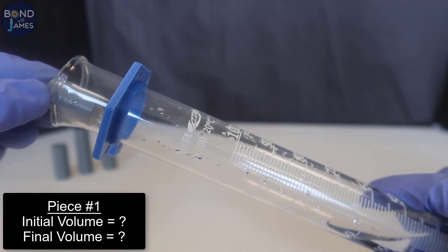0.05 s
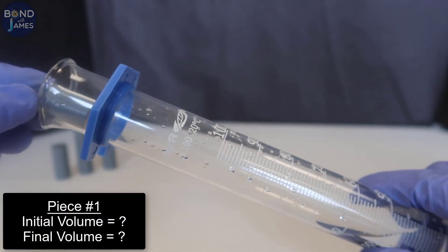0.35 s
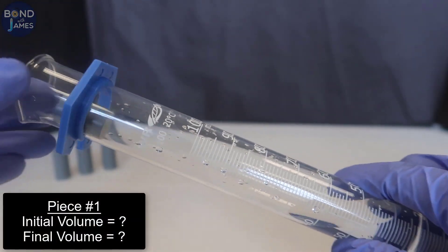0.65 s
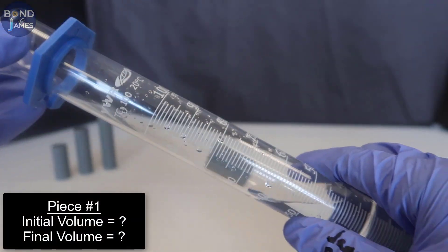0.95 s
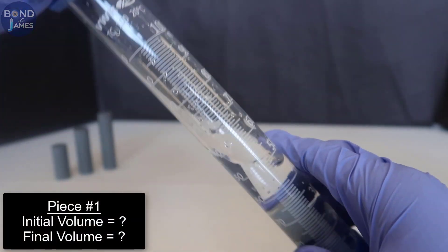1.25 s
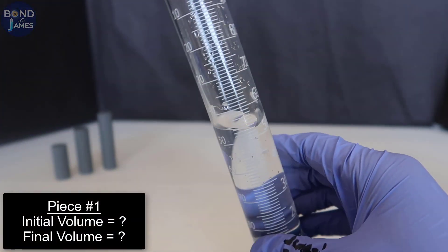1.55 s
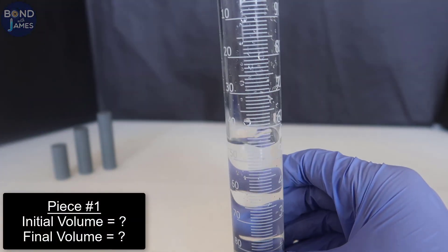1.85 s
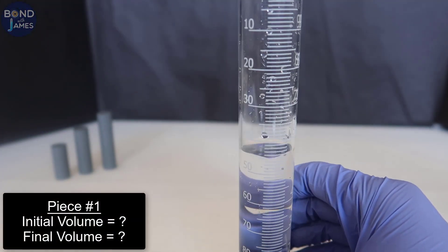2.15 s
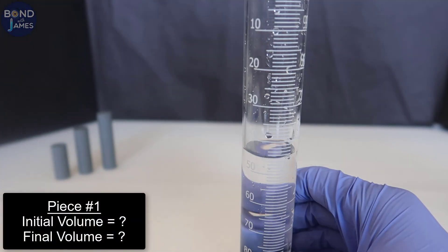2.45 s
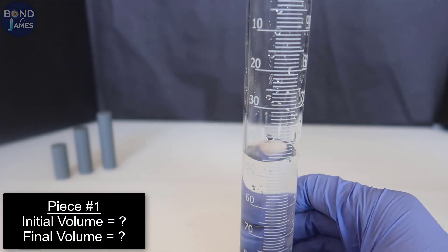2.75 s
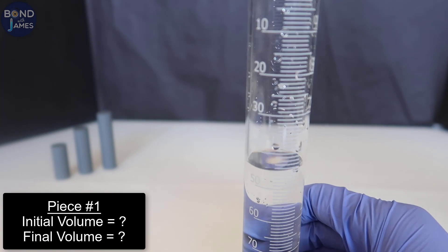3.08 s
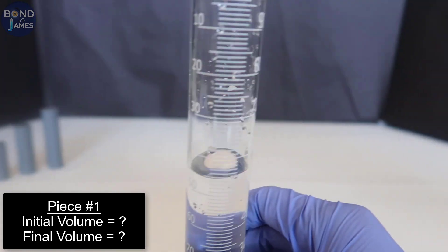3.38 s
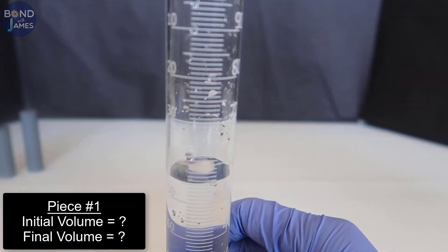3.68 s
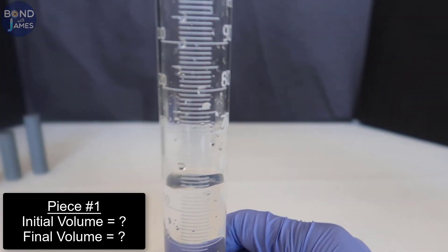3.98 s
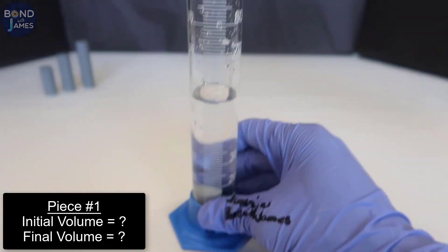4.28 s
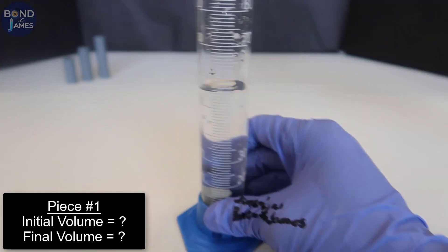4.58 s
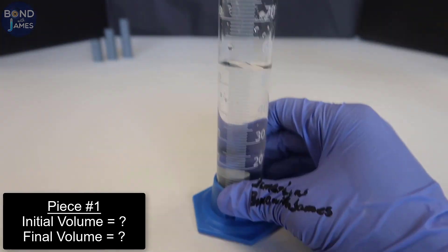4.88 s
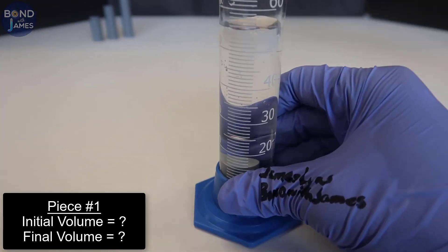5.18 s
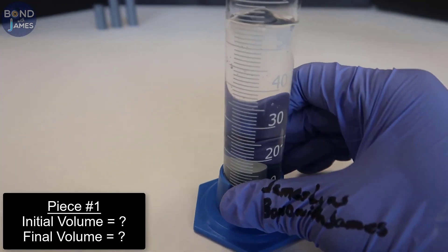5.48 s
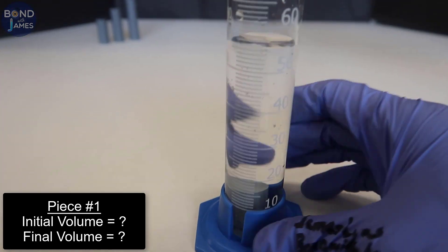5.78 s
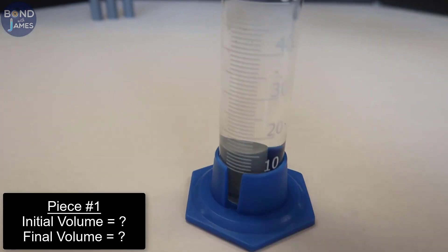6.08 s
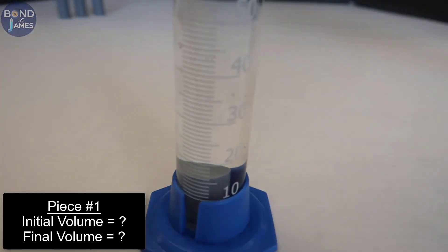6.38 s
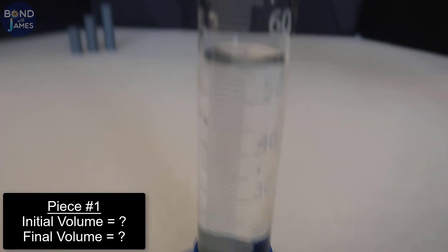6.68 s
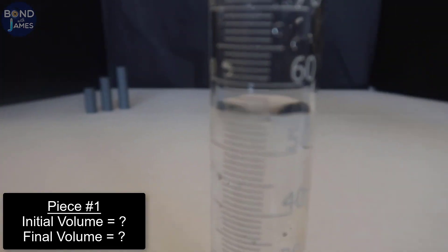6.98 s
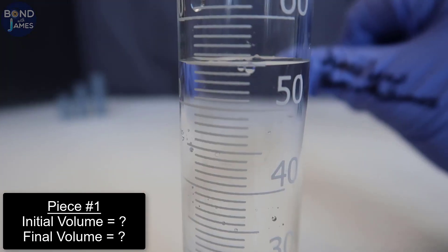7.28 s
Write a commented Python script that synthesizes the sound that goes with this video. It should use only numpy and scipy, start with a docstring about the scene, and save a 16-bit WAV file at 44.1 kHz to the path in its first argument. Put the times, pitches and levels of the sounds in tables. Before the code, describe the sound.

A low ventilation hum runs throughout in a small, quiet room, with everything close to the microphone. From about 0.4 seconds a sleeve and glove rustle faintly, with tiny taps on glass. At 1.3 seconds a plastic piece plunges into water with a small gulp and bubble plinks; at 1.6 the glass cylinder rings briefly. Dull knocks with light taps come at 2.1 and 2.4, then a glove scuff, short sliding pushes and a sharp click at 3.3. From 3.8 to 5.1 the cylinder drags over the table with a dry hiss, taps, knocks and a low shudder, loudest near 4.6. Two short shuddering pushes follow around 5.3 and 5.5, with a faint plink. The glove scuffs near 5.9, small plastic clicks scatter from 6.3 to 6.7, and a last light tap comes at 7.

```python
"""A table in a quiet, humming room. A gloved hand tilts a glass cylinder of water: a plastic piece
slides in with a gulp of trapped air and a few bubbles, and the glass rings briefly as it lands.
Then things are dragged over the table: friction gives a dry hiss, and stick-slip a low shudder that
reaches the microphone through its stand. Sleeve and glove rustle, plastic clicks, the table knocks,
and glass and other hard things are lightly tapped."""
import sys
import numpy as np
from scipy import signal
from scipy.fft import rfft, irfft, next_fast_len
from scipy.io import wavfile
from scipy.ndimage import uniform_filter1d

SR = 44100
rng = np.random.default_rng(int(sys.argv[2]) if len(sys.argv) > 2 else 0)


def materialize(psi):
    """Save the field psi as 16-bit PCM at rate SR to the path in sys.argv[1].

    A 1-D psi becomes a single channel; in a 2-D psi each row is a channel.
    """
    bounded = np.clip(np.atleast_2d(psi).T, -1, 1)
    quanta = np.round(bounded * 32767).astype(np.int16)
    wavfile.write(sys.argv[1], SR, quanta)


N = 328364

# Short pushes over the table. Each row: start and length in seconds, hiss, ring and shudder in dB.
PUSHES = [(2.837, 0.36, -61, -60.5, -50.5), (3.38, 0.2, -59, -57, -48.5), (3.684, 0.053, -66, -66, -60),
          (5.15, 0.13, -72.5, -67.5, -77), (5.269, 0.13, -56.5, -55, -39),
          (5.471, 0.083, -58.5, -55, -45.5), (5.595, 0.045, -71.5, -69, -64)]
PUSH_EDGES_S = (0.02, 0.031)  # attack, release


def undb(db):
    """Decibels to gain."""
    return 10 ** (np.asarray(db) / 20)


def unit(x):
    """Scale to rms 1."""
    return x / np.sqrt(np.mean(x ** 2))


def fade(rows, column):
    """Gain from a dB column interpolated over time, silent outside its span."""
    rows = np.array(rows)
    return undb(np.interp(np.arange(N) / SR, rows[:, 0], rows[:, column], -200, -200))


def add(track, start_s, sound):
    """Mix a sound into the track."""
    i = int(start_s * SR)
    track[i:i + len(sound)] += sound[:N - i]


def colour(x, points):
    """Filter by a curve of (Hz, dB) points that falls steeply beyond its ends; rms 1."""
    hz, db = np.transpose(points)
    size = next_fast_len(N, real=True)
    log_hz = np.log(np.arange(size // 2 + 1) * SR / size + 1)
    beyond = np.maximum(np.log(hz[0]) - log_hz, 0) + np.maximum(log_hz - np.log(hz[-1]), 0)
    gain = undb(np.interp(log_hz, np.log(hz), db) - 60 * beyond)
    return unit(irfft(rfft(x, size) * gain, size)[:N])


def resonate(x, hz, width_hz):
    """Steep resonance: the same band-pass twice."""
    b, a = signal.iirpeak(hz, hz / width_hz, SR)
    return signal.lfilter(b, a, signal.lfilter(b, a, x))


def ring(modes, detune=0., length_s=.4):
    """Damped sines of one blow, alternating in sign, with optional random detuning."""
    t = np.arange(int(length_s * SR)) / SR
    out = np.zeros(len(t))
    for k, (hz, db, t60_s) in enumerate(modes):
        detuned_hz = hz * (1 + detune * rng.standard_normal())
        out += (-1) ** k * undb(db - 60 * t / t60_s) * np.sin(2 * np.pi * detuned_hz * t)
    return out


def soften(x, rise_s):
    """Round off the onset."""
    t = np.arange(len(x)) / SR
    return x * (1 - np.exp(-(t / rise_s) ** 2))


def walk(rate_hz):
    """Smooth random wander, rms 1."""
    hold = int(SR / rate_hz)
    steps = np.repeat(rng.standard_normal(N // hold + 1), hold)
    return unit(uniform_filter1d(uniform_filter1d(steps, hold), hold)[:N])


def friction(grain_db, flutter_db):
    """Countless tiny slips of uneven size, in flurries."""
    sizes = undb(grain_db * np.minimum(rng.exponential(size=N // 16 + 1), 6))
    grains = rng.standard_normal(N) * np.repeat(sizes, 16)[:N]
    return unit(grains * undb(flutter_db * walk(45)))


def stroke(start_s, length_s, db, drift_db, edges_s):
    """Gain of one hand stroke: exponential attack, drifting hold, exponential release."""
    t = np.arange(N) / SR - start_s
    attack_s, release_s = edges_s
    gate = np.exp(np.minimum(t, 0) / attack_s - np.maximum(t - length_s, 0) / release_s)
    return gate * undb(db + drift_db * (np.clip(t / length_s, 0, 1) - .5))


def blows(hits, modes, detune, chatter, chatter_s):
    """Hard contacts ring a set of modes; brief chatter follows each first touch."""
    lead_db, lead_octaves = 8.5, .12
    out = np.zeros(N)
    t = np.arange(SR // 40) / SR
    hz, mode_db, t60_s = np.transpose(modes)
    for start_s, peak_db, db_per_octave, *leading_hz in hits:
        force = chatter * rng.standard_normal(len(t)) * np.exp(-t / chatter_s)
        force[0] = 1
        tilted_db = mode_db + db_per_octave * np.log2(hz / 4000)
        lift_db = sum(lead_db * np.exp(-(np.log2(hz / f) / lead_octaves) ** 2) for f in leading_hz)
        ringing = ring(zip(hz, tilted_db + lift_db, t60_s), detune, length_s=.08)
        sound = signal.fftconvolve(ringing, force)
        add(out, start_s, undb(peak_db) * sound / np.abs(sound).max())
    return out


def reverb(x, wet_db, t60_s):
    """Add the dull echo of a small room."""
    t = np.arange(SR // 2) / SR
    tail = soften(rng.standard_normal(len(t)) * 1000 ** (-t / t60_s), rise_s=.006)
    tail = signal.sosfilt(signal.butter(1, 4500, fs=SR, output="sos"), tail)
    return x + undb(wet_db) * signal.fftconvolve(x, tail / np.linalg.norm(tail))[:N]


def room_tone():
    """Ventilation rumble with a wavering hum."""
    # Each row: frequency in Hz, relative level in dB.
    air_spectrum = [(12, -52), (20, -2), (65, -2), (86, -17.5), (120, -8), (142, -18.5), (168, -16),
                    (262, -22.5), (367, -24), (422, -29.5), (718, -36), (1120, -40.5), (1370, -42.5),
                    (14300, -59), (16000, -87)]
    # Each row: frequency in Hz, rms level in dB, start in seconds.
    hum_tones = [(59.1, -57, 1), (115, -60, 0), (258.5, -78, 1), (339.5, -71, 4)]
    air = colour(rng.standard_normal(N), air_spectrum) * undb(-47.8 + 0.22 * walk(6.1))
    hum = np.zeros(N)
    for hz, db, start_s in hum_tones:
        gain = np.sqrt(2) * undb(db + 1.94 * walk(6))
        phase = 2 * np.pi * np.cumsum(hz + 1.537 * walk(9)) / SR
        add(hum, start_s, soften(gain * np.sin(phase), rise_s=0.044))
    return air + hum


def rustle():
    """Sleeve and glove rub during the tilt, then brush faintly in single strokes."""
    # Each row: time in seconds, relative level in dB.
    tilt_levels = [(.33, -79), (.39, -68), (.52, -62.5), (.92, -61.5), (1.02, -65.5), (1.28, -64.5),
                   (1.35, -59), (1.53, -70), (1.9, -79.5)]
    # Each row: start and length in seconds, relative level and drift in dB.
    brushes = [(.165, .01, -68, 0), (1.66, 0.068, -75.5, -1), (2.18, 0.3, -74.5, -10.5),
               (2.66, 1.03, -66.5, 0), (6.105, 0.014, -59.5, 1), (6.205, 0.049, -68.5, 1),
               (6.07, 0.59, -67, 5), (6.71, 0.32, -78.5, -13)]
    # Each row: frequency in Hz, relative level in dB.
    cloth_spectrum = [(700, 0.5), (1500, -0.5), (2200, 2), (2900, 2), (3350, 3), (3650, 1), (5000, 2),
                      (7500, 1.5), (10000, -6.5), (16000, -11)]
    gain = fade(tilt_levels, 1) + sum(stroke(*row, edges_s=(0.015, 0.019)) for row in brushes)
    return gain * undb(2) * colour(friction(grain_db=2.15, flutter_db=2.0), cloth_spectrum)


def glove_scuffs():
    """Short, bright friction strokes that end as the glove lifts off."""
    # Each row: start and length in seconds, level and drift in dB.
    scuffs = [(2.578, 0.072, -51.5, 3.5), (2.728, 0.047, -61, 3), (5.835, .17, -53, 2.5),
              (6.01, 0.048, -50, -6), (6.338, 0.0065, -55.5, 17)]
    # Each row: frequency in Hz, relative level in dB.
    scuff_spectrum = [(800, -18), (1500, -8), (2200, -5.5), (3500, -0.5), (5000, -3), (7300, -2),
                      (9000, -5.5), (10500, -11), (16000, -16)]
    gain = sum(stroke(*row, edges_s=(0.0088, 0.0042)) for row in scuffs)
    return gain * colour(friction(grain_db=0.8, flutter_db=1.0), scuff_spectrum)


def glove_squeaks():
    """The glove slips on the glass in tiny squeaks."""
    # Each row: start in seconds, relative peak in dB, tilt in dB per octave.
    slips = [(1.1733, -45, -12), (1.176, -31.5, 0), (4.0044, -31, 12), (4.009, -35, 8), (4.0145, -32, 5),
             (4.0195, -37, -1), (5.541, -39, 25)]
    # Each row: frequency in Hz, relative level in dB, T60 in seconds.
    slip_modes = [(8900, 1, 0.0034), (9700, -3, 0.0039), (11200, -7, 0.0064), (13400, -10, 0.0058),
                  (15000, -17, .005)]
    return blows(slips, slip_modes, detune=0.028, chatter=0.19, chatter_s=0.0016) * undb(-3.5)


def plastic_clicks():
    """Sharp contacts ring the high, fast-dying modes of plastic."""
    # Each row: start in seconds, peak in dB, tilt in dB per octave.
    clicks = [(3.3135, -26.5, 1), (3.319, -37, -6), (3.3285, -40, -7), (3.970, -37, 4), (3.976, -32, -3.5),
              (3.984, -33, 13), (6.361, -32.5, 0), (6.3665, -33.5, 12), (6.4005, -39, -1),
              (6.409, -39.5, -5), (6.5215, -37.5, 5), (6.5232, -35, -6.5), (6.574, -38, -2),
              (6.5845, -32.5, -1), (6.605, -30, 0), (6.623, -31.5, 0), (6.6448, -33.5, 0.5)]
    # Each row: frequency in Hz, relative level in dB, T60 in seconds.
    plastic_modes = [(1960, -11.5, 0.0034), (2710, -10, 0.0092), (3450, -9, 0.0029), (4240, -12, 0.0081),
                     (5570, 3.5, 0.0029), (5800, 0, 0.0044), (6930, -0.5, 0.0037), (7600, 0.5, 0.0025),
                     (9250, -9, 0.0038), (11000, -11.5, 0.0035), (12000, -8, 0.0015),
                     (14570, -18.5, 0.0097)]
    return blows(clicks, plastic_modes, detune=0.025, chatter=.28, chatter_s=0.002)


def knocks():
    """Soft blows rock the stand and ring the table top."""
    # Each row: start in seconds, stand gain and table top gain in dB.
    hits = [(2.051, -25.5, -42.5), (2.428, -30, -46), (3.332, -36.5, -42), (3.384, -36.5, -48),
            (3.495, -36.5, -63), (3.763, -32, -28.5), (4.53, -24, -34), (4.582, -25, -39),
            (4.675, -36, -31)]
    # Each row of both: frequency in Hz, relative level in dB, T60 in seconds.
    stand_modes = [(56.1, 1.5, 0.34), (75.2, 2, 0.12)]
    top_modes = [(183.6, -1.5, 0.09), (213, -5, 0.087), (249.7, -7.5, 0.21)]
    out = np.zeros(N)
    for start_s, stand_db, top_db in hits:
        add(out, start_s, undb(stand_db) * soften(ring(stand_modes), rise_s=0.0072))
        add(out, start_s, undb(top_db) * soften(ring(top_modes, detune=0.0264), rise_s=0.0023))
    return out


def shudder():
    """Stick-slip shakes the stand near its resonance, with faint overtones."""
    # The long drag. Each row: time in seconds, level in dB.
    shudder_levels = [(3.76, -42), (3.86, -31), (3.94, -37.5), (4.01, -30.5), (4.06, -45.5), (4.22, -36.5),
                      (4.29, -30.5), (4.43, -22), (4.52, -27.5), (4.64, -14), (4.76, -19), (4.8, -26.5),
                      (4.93, -24), (5.04, -36), (5.13, -57)]
    base_hz, sag_hz, sag_at_s, sag_width_s = 68, 13, 4.32, 0.0604
    t = np.arange(N) / SR
    pushes = sum(stroke(start_s, length_s, db, 0, PUSH_EDGES_S) for start_s, length_s, _, _, db in PUSHES)
    effort = fade(shudder_levels, 1) + pushes
    hz = base_hz - sag_hz * np.exp(-((t - sag_at_s) / sag_width_s) ** 2)  # the stand takes up the load
    hz *= 1 - 0.303 * effort  # wide swings stick longer
    phase = 2 * np.pi * np.cumsum(hz * (1 + 0.0527 * walk(40))) / SR
    swing = effort * undb(1.1 * walk(45)) * np.sqrt(2)
    overtones = undb(-34) * walk(60) * (np.sin(2 * phase) + np.cos(3 * phase))
    return swing * (np.sin(phase) + overtones)


def drag():
    """One long drag and short pushes: sliding contact hisses, rings the dragged body and grinds."""
    # Each row: time in seconds, then hiss, ring and grind gains in dB.
    drag_levels = [(3.75, -75, -76, -61.5), (3.815, -55.5, -72, -64), (3.84, -54.5, -50.5, -49),
                   (3.92, -54.5, -55.5, -61), (4.06, -59, -64, -62), (4.16, -57, -54, -60.5),
                   (4.46, -49.5, -51.5, -59.5), (4.64, -50, -47, -54), (4.71, -56.5, -52, -53.5),
                   (4.79, -49, -51.5, -61.5), (4.87, -48, -51, -62.5), (5.0, -58, -59.5, -71.5),
                   (5.12, -77, -65.5, -92)]
    # Each row of all three: frequency in Hz, relative level in dB.
    hiss_spectrum = [(2900, -2.5), (3200, -5.5), (3700, -2.5), (5000, -3.5), (6000, -6), (7400, -5.5),
                     (10000, -10.5), (13500, -15.5), (16000, -19)]
    body_spectrum = [(1660, -7), (1770, 0.5), (1900, 0.5), (2130, 2), (2420, 1), (2780, 0), (3050, -9.5)]
    grind_spectrum = [(120, -7), (200, 3.5), (330, -6), (480, -1.5), (640, -5.5), (800, -5), (1080, -11),
                      (1270, -9.5), (1400, -13), (1700, -12.5)]
    # Peaks above the body's mode cluster. Each row: frequency and width in Hz, relative level in dB.
    sharp_modes = [(1810, 105, -4.5), (2405, 166, 2.5), (2633, 180, -3), (2790, 100, -9), (4720, 360, 1.5)]
    hiss = colour(friction(grain_db=1.26, flutter_db=1.58), hiss_spectrum) * undb(1)
    slips = friction(grain_db=2.5, flutter_db=1.5)
    # as the contact point shifts, the resonances take turns to lead
    singing = sum(undb(db + 5.5 * walk(22)) * resonate(slips, hz, width_hz)
                  for hz, width_hz, db in sharp_modes)
    body = colour(slips, body_spectrum) * undb(-1) + unit(singing) * undb(-6.5)
    grind = colour(friction(grain_db=1.5, flutter_db=2.24), grind_spectrum) * undb(4.5)
    out = hiss * fade(drag_levels, 1) + body * fade(drag_levels, 2) + grind * fade(drag_levels, 3)
    # pushes are slower, so their hiss is slightly duller
    treble = signal.sosfiltfilt(signal.butter(2, 5500, "high", fs=SR, output="sos"), hiss)
    rubbing = hiss + (undb(-0.5) - 1) * treble + undb(-17) * grind
    for start_s, length_s, hiss_db, ring_db, _ in PUSHES:
        gain = stroke(start_s, length_s, hiss_db, 0, PUSH_EDGES_S)
        out += gain * (rubbing + undb(ring_db - hiss_db) * body)
    return out


def taps():
    """Light taps on glass and other hard things, each with its own leading pitch,
    and a dull thud as the drag starts."""
    # Each row: start in seconds, peak in dB, tilt in dB per octave, leading pitch in Hz.
    hits = [(.528, -45, 10, 3270), (.8945, -41.5, 0, 1920), (.940, -46, 7, 1950), (1.047, -48, -2, 1940),
            (1.563, -34.5, 11.5, 4000), (1.7306, -53, 10, 3270), (2.0425, -33, 6, 2500),
            (2.4215, -44.5, 7, 2580), (3.3394, -39.5, 5, 1880), (3.831, -39.5, -14, 1900),
            (3.8797, -33, 13.5, 3270), (4.0862, -34.5, 10, 3270), (4.110, -35, 10, 3270),
            (6.3047, -45.5, 7, 4400), (6.7966, -46.5, 10, 3270), (7.0485, -39.5, 3.5, 1940)]
    # Each row: frequency in Hz, relative level in dB, T60 in seconds.
    tap_modes = [(1790, 3, 0.009), (2470, 3, 0.014), (3260, -1, 0.011), (3830, -7.5, 0.015),
                 (4420, -7, 0.0085), (5700, -5.5, 0.0034), (7140, -14.5, 0.0098), (8780, -15, 0.0051)]
    return blows(hits, tap_modes, detune=0.015, chatter=0.08, chatter_s=0.003)


def air_pocket():
    """Trapped air rings low, then shrinks quickly and rises in pitch as it dies away."""
    start_hz, shrunk_hz, shrink_at_s, shrink_s = 684.5, 1420, .044, .0048
    level_db, t60_s = -29, 0.13
    t = np.arange(SR // 4) / SR
    shrunk = (1 + np.tanh((t - shrink_at_s) / (2 * shrink_s))) / 2
    hz = start_hz + (shrunk_hz - start_hz) * shrunk
    return undb(level_db - 60 * t / t60_s) * np.sin(2 * np.pi * np.cumsum(hz) / SR)


def water():
    """The plunge traps a pocket and rings the air above the water.
    Bubbles plink, and the glass rings briefly as the piece lands."""
    # Each row: frequency in Hz, level in dB, T60 in seconds.
    air_column_modes = [(496.7, -28.5, 0.24), (550, -23.5, 0.023)]
    # Bubbles, and the glass at 2434 Hz.
    # Each row: start in seconds, pitch in Hz, level in dB before onset rounding, T60 in seconds.
    plinks = [(.767, 1250, -43, .013), (.791, 1700, -33, 0.0063), (1.173, 2250, -32, 0.0073),
              (1.1948, 1490, -37.5, .034), (1.249, 2410, -44.5, 0.054), (1.2565, 1543, -26, 0.029),
              (1.3065, 1467, -22, 0.044), (1.5648, 1544, -20, 0.032), (1.562, 1648, -31, .027),
              (1.5639, 2434, -29.5, 0.023), (4.187, 1420, -40, .017), (4.896, 1430, -35, 0.035),
              (5.560, 1485, -33, 0.019), (6.765, 1450, -46, 0.018)]
    plunge_s, burst_db, burst_decay_s = 1.257, -21.5, 0.0093
    out = np.zeros(N)
    add(out, plunge_s, soften(air_pocket(), rise_s=.001))
    add(out, plunge_s, soften(ring(air_column_modes), rise_s=0.00057))
    t = np.arange(SR // 20) / SR
    for start_s, hz, db, t60_s in plinks:
        add(out, start_s, soften(ring([(hz, db, t60_s)]), rise_s=0.002))
        burst = unit(resonate(rng.standard_normal(len(t)), hz, width_hz=hz / 4))
        add(out, start_s, undb(db + burst_db) * burst * np.exp(-t / burst_decay_s))
    return out


def scene():
    """All sources close to one microphone; water and small contacts echo faintly."""
    small_sounds = water() + taps() + plastic_clicks() + glove_squeaks()
    echoed = reverb(small_sounds, wet_db=-24.5, t60_s=0.38)
    return (echoed + knocks() + rustle() + glove_scuffs() + drag() + shudder() + room_tone())[None]


def record(dry):
    """Steep low-pass at 15.8 kHz."""
    return signal.sosfilt(signal.ellip(10, .2, 70, 15800, fs=SR, output="sos"), dry)


dry = scene()
out = record(dry)
materialize(out)
```